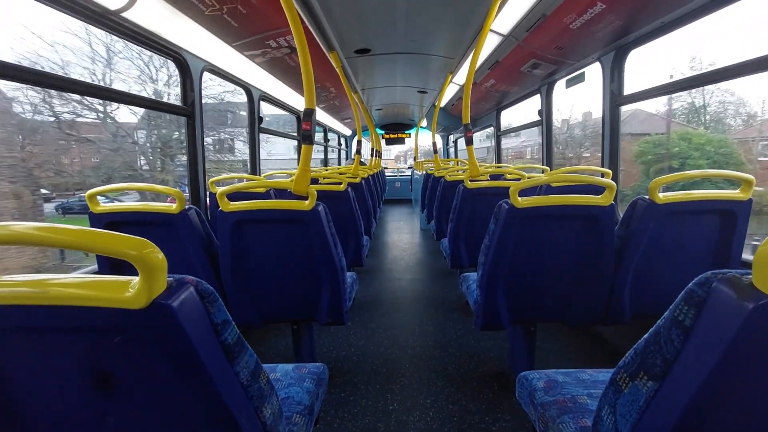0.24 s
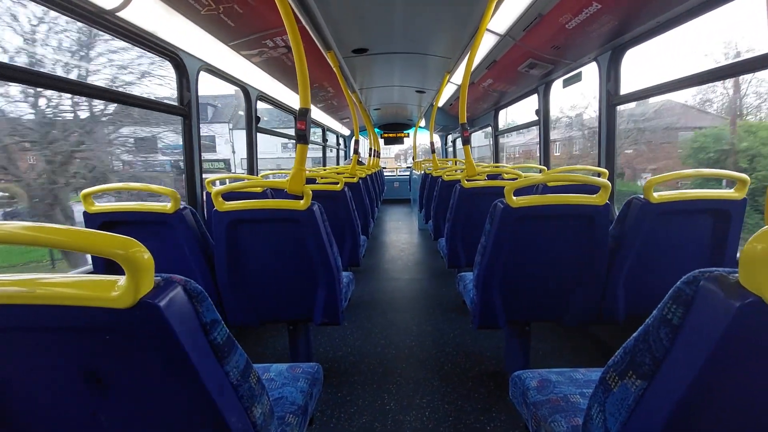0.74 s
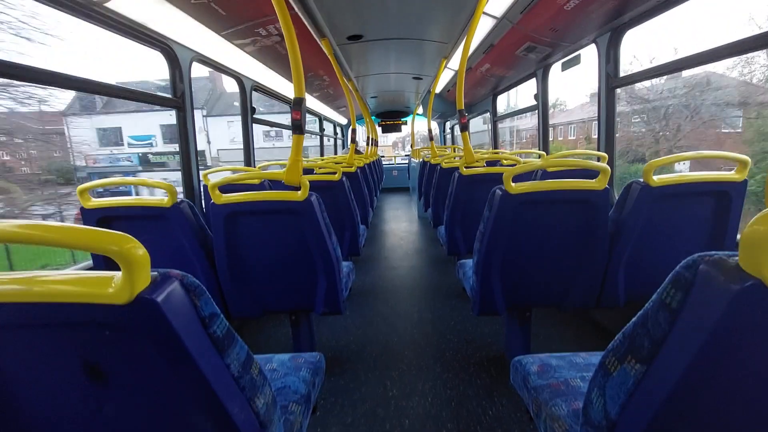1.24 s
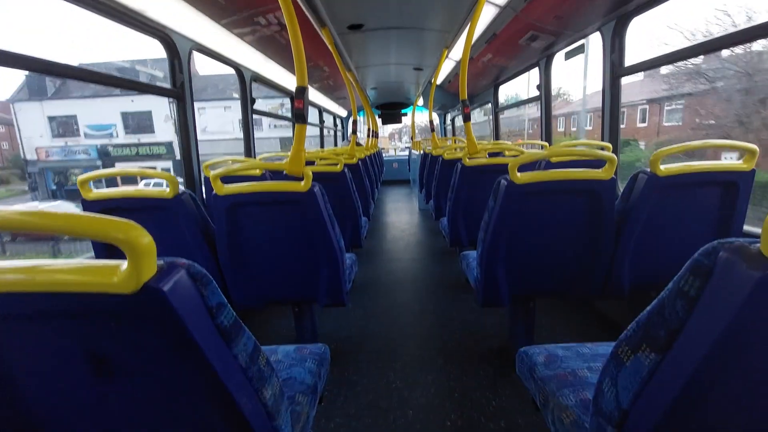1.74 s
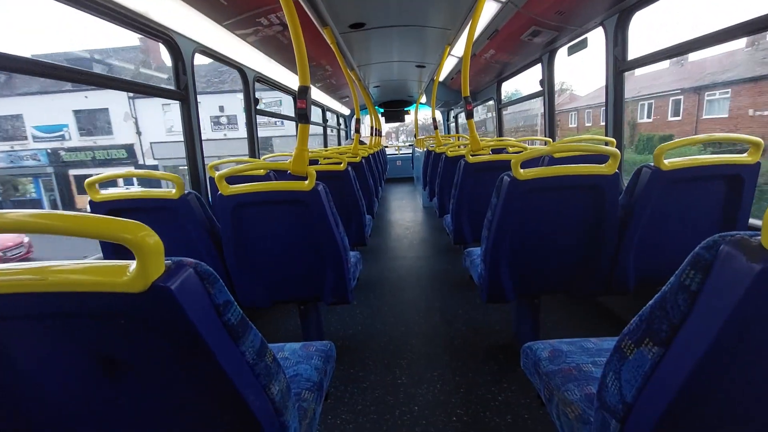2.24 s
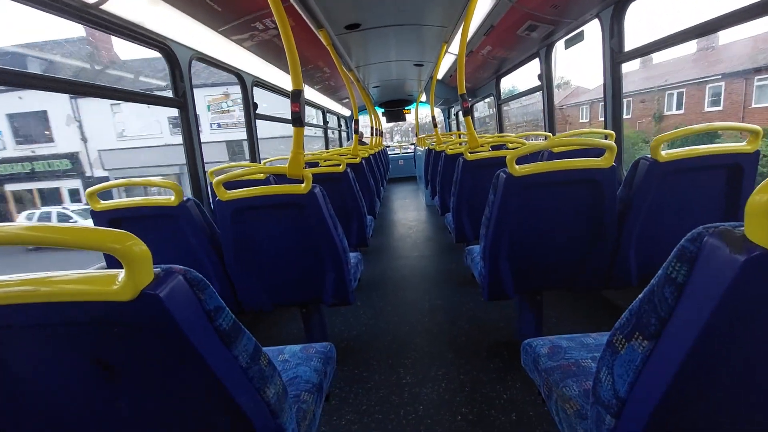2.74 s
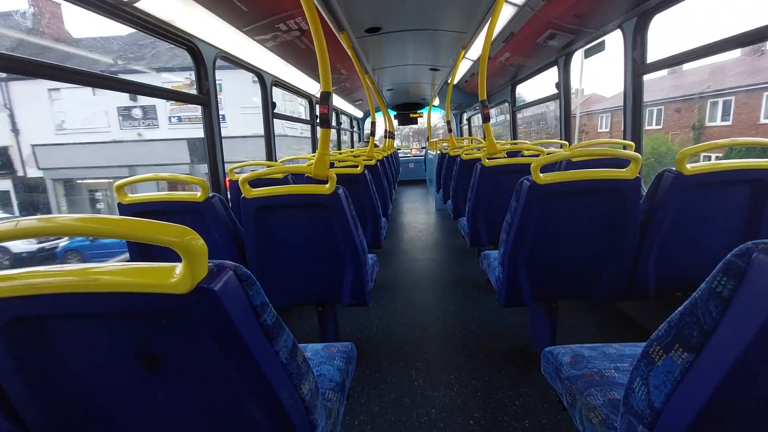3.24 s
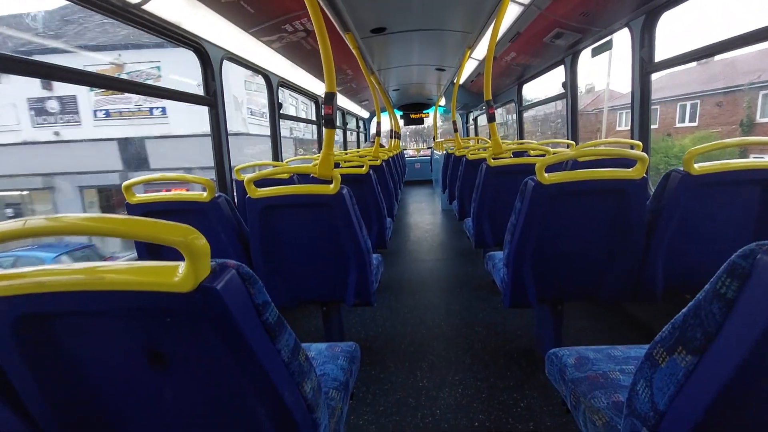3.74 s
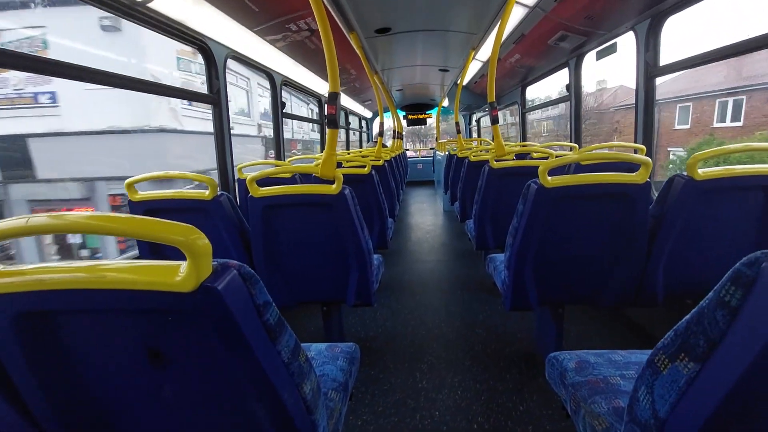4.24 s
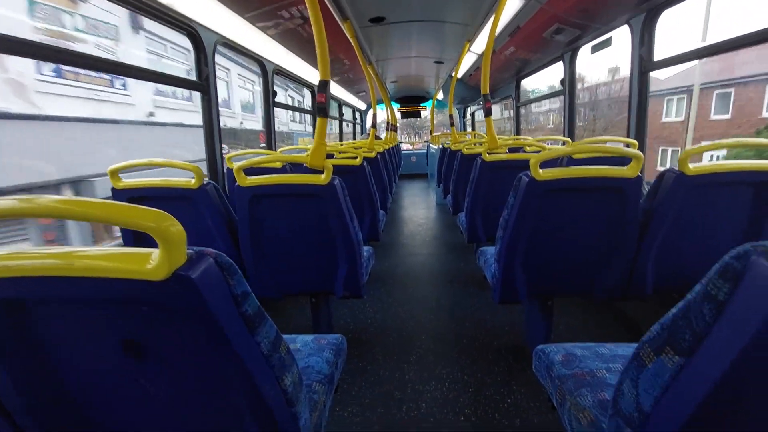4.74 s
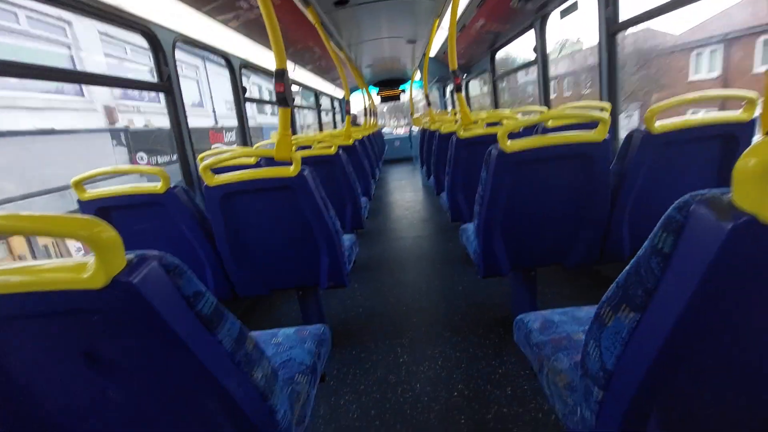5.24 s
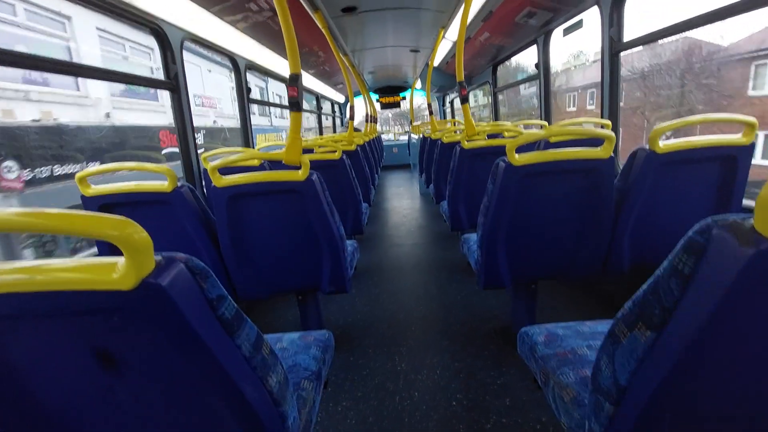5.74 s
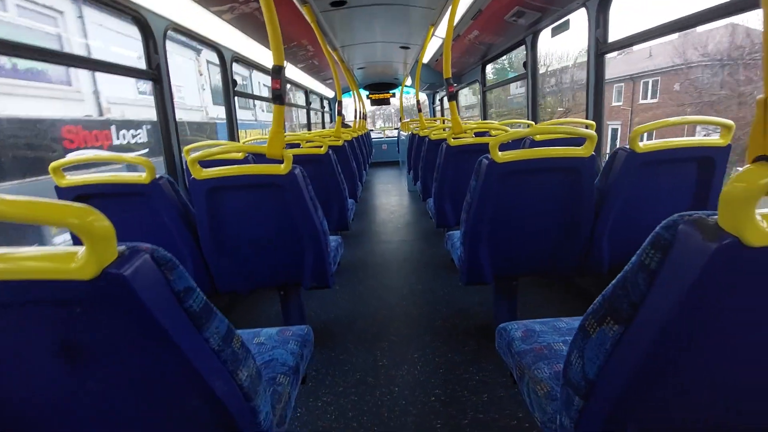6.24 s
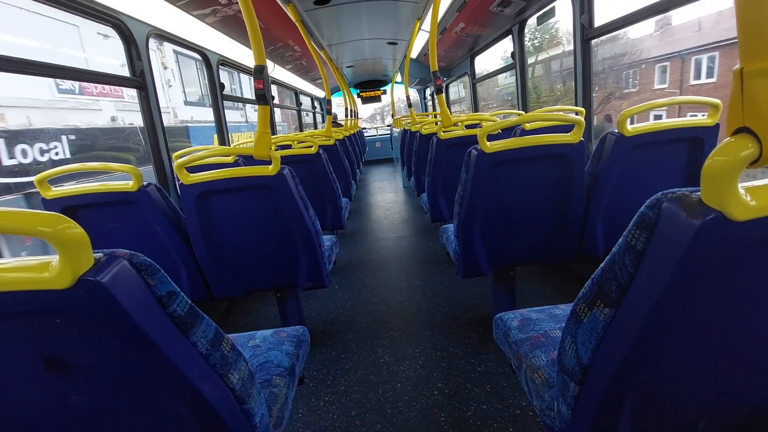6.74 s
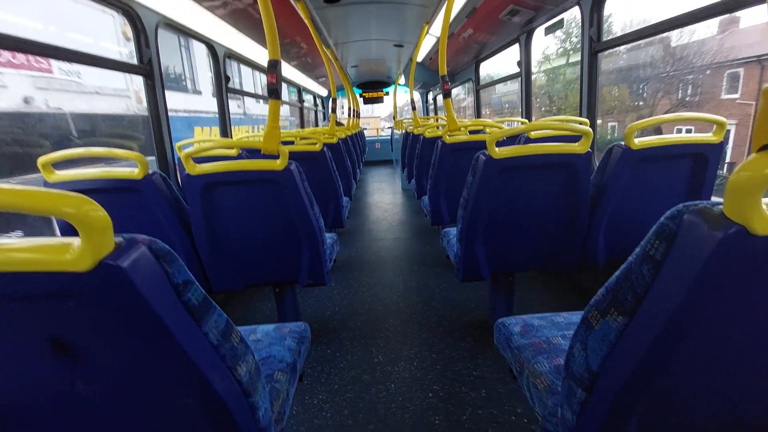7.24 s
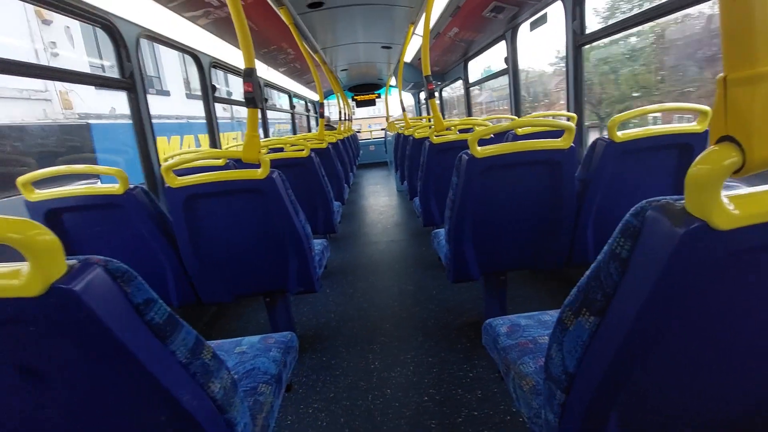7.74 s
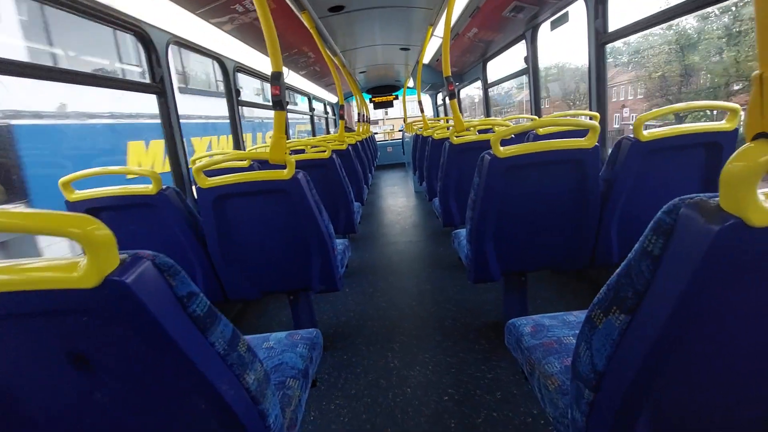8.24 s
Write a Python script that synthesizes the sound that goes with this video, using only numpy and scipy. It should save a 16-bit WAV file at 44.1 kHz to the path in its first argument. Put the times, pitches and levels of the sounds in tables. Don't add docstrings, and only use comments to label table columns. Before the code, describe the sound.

A bus cabin interior, close and boomy, with no people heard. Deep engine drone and body rumble dominate under a wavering, falling axle whine. Small metallic chinks, a tiny plastic chirp and a brief seat squeak appear among dull knocks and glassy rattles. After soft floor thumps, one violent jolt shakes the panels; the level drops afterwards and recovers as the whine stops and the engine rises in pitch.

```python
import sys
import numpy as np
from scipy import signal
from scipy.fft import rfft, irfft
from scipy.io import wavfile
from scipy.ndimage import uniform_filter1d

SR = 44100
rng = np.random.default_rng(int(sys.argv[2]) if len(sys.argv) > 2 else 0)


def attenuation_scalar(level_db):
    decades = np.asarray(level_db, float) / 20
    return 10 ** decades


def dump_mix(stems):
    frames = np.atleast_2d(stems).T
    limited = np.clip(frames, -1, 1)
    pcm = np.round(limited * 32767).astype(np.int16)
    wavfile.write(sys.argv[1], SR, pcm)


N = 373968
T = np.arange(N) / SR
HZ = np.fft.rfftfreq(N, 1 / SR)


def read(table, at=T):
    s, *columns = np.transpose(table)
    return [np.interp(at, s, column) for column in columns]


def on_log(table, hz):
    f, value = np.transpose(table)
    return np.interp(np.log(hz + 1), np.log(f + 1), value)


def unit(x):
    return x / np.sqrt(np.mean(x ** 2))


def ramp(start, length):
    return np.clip((T - start) / length, 0, 1)


def walk(rate):
    hold = int(2000 / rate)
    held = np.repeat(rng.standard_normal(17000 // hold + 1), hold)
    slewed = uniform_filter1d(uniform_filter1d(held, hold), hold)
    return 1.3 * np.interp(T * 2000, range(len(held)), slewed)


def tone(hz, db, wobble_db, drift):
    wobble = wobble_db * (walk(4) + walk(15)) / np.sqrt(2)
    size = np.sqrt(2) * attenuation_scalar(db + wobble)
    cycles = np.cumsum(hz * (1 + drift * walk(6))) / SR
    return size * np.sin(2 * np.pi * cycles + 6 * rng.random())


def decays(s, size, t60):
    env = np.zeros(np.shape(size)[:-1] + (N,))
    for k in range(len(s)):
        i = int(s[k] * SR)
        t = T[:min(int(t60[k] * SR), N - i)]
        fall = np.exp(-np.log(1000) * t / t60[k])
        env[..., i:i + len(t)] += np.multiply.outer(size[..., k], fall)
    return env


# (frequency [Hz], correlation [-1..1])
ALIKE = [(30, .99), (60, .86), (130, .94), (290, .81), (640, .23), (1410, -.36), (3100, .02), (6820, -.08),
         (15000, 0)]


def field(gain):
    mid, side = rfft(rng.standard_normal((2, N)))
    likeness = np.clip(on_log(ALIKE, HZ), -.99, .99)
    opposite = np.array([[1], [-1]])
    return gain * (np.sqrt(1 + likeness) * mid + np.sqrt(1 - likeness) * side * opposite)


# (time [s], firing tone level [dB])
LOAD = [(0, -26), (.4, -35), (1.5, -36), (2, -30), (2.25, -49), (2.7, -36.5), (3.6, -32), (4.2, -27.5),
        (4.75, -34), (5.05, -27), (5.3, -44), (6, -27.5), (6.6, -36), (7, -32), (7.3, -30.5), (8.48, -32)]
# (multiple of the firing rate [ratio], level under the second multiple [dB])
ORDERS = [(.5, -6), (1.5, -8), (2.5, -4), (3, -6), (3.5, -6), (5, -10), (7, -16)]
HIGH_GEAR, LOW_GEAR, SHIFT_S, IDLE_HZ = 11.1, 8.0, 2.275, 43.06
PULL_S, PULL_RISE_S, PULL_HZ = 7.3, .7, 54.26
SECOND_DB, SECOND_FOLLOWS, SECOND_PULL_DB = -38, 0.13, 4.0
MESH_PER_THROB, THROB_S, THROB_DEPTH = 110.5, 0.088, 0.76
DRUM_ORDER, DRUM_DB = 3.55, -35


def engine():
    mesh_hz = read(AXLE)[0]
    ratio = HIGH_GEAR + (LOW_GEAR - HIGH_GEAR) * ramp(SHIFT_S, 0.0508)
    geared_hz = np.maximum(mesh_hz / ratio, IDLE_HZ)
    pull = ramp(PULL_S, PULL_RISE_S)
    hz = geared_hz + (PULL_HZ - geared_hz) * pull

    first_db = read(LOAD)[0]
    second_db = SECOND_DB + SECOND_FOLLOWS * (first_db - np.median(first_db)) + SECOND_PULL_DB * pull

    before_shift = 1 - ramp(SHIFT_S, .05)
    turns = np.cumsum(mesh_hz) / SR / MESH_PER_THROB
    beat = np.cos(2 * np.pi * (turns - np.interp(THROB_S, T, turns)))
    throb = 1 + THROB_DEPTH * before_shift * beat

    drum = before_shift * tone(DRUM_ORDER * hz, DRUM_DB, 2.6, .003)
    firing = throb * tone(hz, first_db + 1.0, 0.84, 0.002)
    double = tone(2 * hz, second_db, 2.9, 0.0041)
    uneven = sum(tone(k * hz, second_db + db - 4.0, 3.5, 0.00395) for k, db in ORDERS)
    return drum + firing + double + uneven


# (time [s], mesh frequency [Hz], whine level [dB])
AXLE = [
    (0, 515, -39),
    (.5, 509.6, -46),
    (1.3, 491.2, -41.5),
    (2.3, 458.4, -51),
    (2.8, 446, -39),
    (3.3, 440, -50.5),
    (4.5, 424.7, -42),
    (5.4, 408.8, -49.5),
    (6.6, 384, -36.5),
    (7.35, 364, -34.5),
]


def axle_whine():
    hz, db = read(AXLE)
    return tone(hz, db - 6.0, 3.4, .006) * np.clip((7.17 - T) / 0.051, 0, 1)


# (frequency [Hz], level over HUM_DB [dB], wobble [dB])
HUM_TONES = [(216.8, -1, 1.45), (426, -27.5, 3.0), (590.7, -17.5, 2.7), (691.4, -21, 2.3)]
HUM_DB = -36


def compressor():
    return sum(tone(f + 0 * T, HUM_DB + db, wobble_db, 0.005046) for f, db, wobble_db in HUM_TONES)


# (time [s], peak level [dB], t60 [s])
THUDS = [(1.92, -19, .4), (3.74, -19.5, 0.27), (4.379, -17, 0.43), (4.756, -12, 0.3), (5.296, -10.5, 0.32),
         (5.314, -10.5, 0.42), (5.347, -10.5, 0.36), (5.385, -2.5, 0.16), (5.424, -22, 0.28),
         (5.45, -13, 0.4), (5.544, -17.5, 0.47), (5.622, -15.5, 0.61), (5.771, -11.5, 0.32),
         (5.94, -16.5, 0.27), (6.047, -14, .3)]
# (frequency [Hz], level per Hz [dB])
THUD_COLOUR = [(24, -35), (40, -2.5), (71, 1.5), (113, -10), (196, -0.5), (234, -1), (273, -1),
               (428, -11.5), (509, -17), (695, -17.5), (2500, -33), (3250, -57), (5500, -120)]


def thuds():
    s, db, t60 = np.transpose(THUDS)
    boom = unit(irfft(field(attenuation_scalar(on_log(THUD_COLOUR, HZ))), N))
    blows = decays(s, attenuation_scalar(db - 10.5), np.clip(t60, .03, 2))
    return boom * uniform_filter1d(blows, size=200)


# (time [s], treble level [dB], mid over treble [dB], left minus right [dB])
KNOCKS = [(0.02, -58, 16, 1), (0.68, -55, 21, -1), (0.941, -53, 16, 1), (0.9794, -51, 11.5, -1),
          (1.046, -57, 14, 3), (1.1807, -53.5, 20, -2), (2.5994, -53, 6, 4), (2.8614, -42.5, 9.5, 1),
          (3.018, -44.5, 12, 4), (3.234, -50.5, 5, 1.5), (3.8325, -50, 8, -7), (4.0802, -50.5, 17.5, -2),
          (4.3794, -54, 11.5, 9), (4.5815, -46, 2, -3.5), (4.783, -50, 0, 2.5), (5.778, -44, 10, -6),
          (5.955, -48.5, 16.5, 0), (6.0364, -47, 11.5, -1), (6.181, -45, 11, 2), (6.2194, -46, 0, 0),
          (6.6594, -51, 5, -4), (7.0882, -48, 14, 2), (7.2492, -54, 19.5, -4), (7.335, -53.5, 17.5, 2),
          (7.4253, -47, 16.5, 3.5), (7.929, -51.5, 16.5, 2)]
# (time [s], treble level [dB], mid over treble [dB], left minus right [dB])
GLASS = [(0.8194, -56, 1, 3), (1.0884, -47, -1, 0.5), (1.346, -49.5, 8.5, 0), (1.5596, -51.5, 9.5, 1.5),
         (2.0474, -55, 7, 4), (2.2154, -46.5, -2, 1.0), (2.62, -57, 4, 1), (2.7028, -48, 10, 1),
         (3.1244, -53, 1, 8), (3.611, -47, -5, 0), (4.119, -57, 4, 3), (4.4274, -43, -6, -.6),
         (4.6293, -43.5, 4.5, -1.5), (4.6924, -48.5, 10, -4), (4.7525, -46, 7, 2), (4.8494, -55, 2, -8),
         (4.92, -53.5, 2, 0), (5.17, -55, 0, 0), (7.3094, -56, 6, 3), (7.36, -57, 2, 1), (8.25, -56, 13, 1)]
# (time [s], treble level [dB], mid over treble [dB], left minus right [dB])
CLATTER = [
    (5.2586, -42, 5, 0),
    (5.296, -42.5, -4, -1.5),
    (5.3414, -25.5, 4, -2),
    (5.377, -44, 20.5, -1),
    (5.4216, -31, -1, 0),
    (5.472, -50, 20.5, 0.5),
    (5.5426, -34, 0.5, 0),
    (5.59, -49.5, -3, 7),
    (5.6653, -45, 0, 1),
]
# (top band over treble [dB], t60 [s])
RATTLE_KINDS = [
    (-10.5, 0.21),
    (-3.5, 0.48),
    (-5, 0.29),
]
# (frequency [Hz], level per Hz [dB])
RATTLE_COLOUR = [(1180, -31), (2000, -2), (2090, -5.5), (2590, -1.5), (3510, -6.5), (3830, -2),
                 (4250, -5.5), (7450, -8), (9330, -17.5), (12300, -11.5), (15800, -14)]


def rattles():
    kinds = [KNOCKS, GLASS, CLATTER]
    s, treble_db, dull_db, pan_db = np.transpose(sum(kinds, []))
    top_db, t60 = np.repeat(RATTLE_KINDS, [len(kind) for kind in kinds], axis=0).T
    t60 = np.clip(t60, .02, 2)
    sides = attenuation_scalar(np.array([pan_db, -pan_db]) / 2)
    colour = attenuation_scalar(on_log(RATTLE_COLOUR, HZ))
    grain = attenuation_scalar(1.1 * walk(200))

    treble = colour * (HZ > 2800) * (HZ < 9300)
    top = colour * (HZ >= 9300)
    dull = np.exp(-(np.log2(HZ / 1250 + 1e-9) / 0.99) ** 2)
    # (spectrum, level [dB], shake [dB], tick [dB], stretch of t60)
    parts = [(treble, treble_db, -10, -9.5, 1.05),
             (top, treble_db + top_db, -4.5, -3, .9),
             (dull, treble_db + dull_db, -8, -11, .85)]
    out = 0
    for spectrum, db, shake_db, tick_db, longer in parts:
        shake = decays(s, attenuation_scalar(db + shake_db) * sides, longer * t60) * grain
        tick = decays(s, attenuation_scalar(db + tick_db) * sides, 0 * s + 0.011)
        out = out + unit(irfft(field(spectrum), N)) * (shake + tick)
    return out


# (time [s], low ring level [dB], high ring level [dB])
CHINKS = [(1.0904, -58, -64), (1.921, -57, -63), (1.9944, -63, -61), (2.0494, -64, -50), (2.3715, -61, -61),
          (2.4324, -68, -64), (2.4892, -63, -65), (3.1244, -67, -63), (3.1794, -61, -60),
          (3.2354, -64, -60), (3.3862, -65, -72), (3.6112, -63, -68), (4.0003, -72, -78),
          (4.1194, -66, -68), (5.6072, -52, -62), (5.7987, -59, -58), (6.4872, -60, -70),
          (6.7496, -57, -71), (6.8518, -66, -79), (6.9042, -56, -72)]
# (frequency [Hz], t60 [s], level [dB])
RINGS = [(4990, 0.24, -5.5), (13800, 0.09, -5.5)]


def chinks():
    s, *levels = np.transpose(CHINKS)
    ring = 0
    for db, (hz, t60, ring_db) in zip(levels, RINGS):
        taps = decays(s, attenuation_scalar(db + ring_db), 0 * s + t60)
        ring = ring + taps * tone(hz * (1 + .004 * walk(150)), 3.0 * walk(90), 2.7, 0.001)
    return ring * attenuation_scalar(np.array([[2.5], [-3.5]]))


def rubbing_note(table, octave_db):
    hz, db = read(table)
    rub_db = db + 3.5 * walk(120)
    hz = hz * (1 + 0.0128 * walk(90))
    upper_db = rub_db + octave_db + .8 * (db - db.max())
    note = tone(hz, rub_db, 1.536, .004) + tone(2 * hz, upper_db, 1.8, .004)
    return note * (T > table[0][0]) * (T < table[-1][0])


# (time [s], frequency [Hz], level [dB])
SQUEAK = [
    (2.915, 1850, -73),
    (2.945, 1870, -47),
    (2.965, 1865, -48),
    (2.99, 1810, -53),
    (3.02, 1770, -54),
    (3.07, 1790, -60),
]


def seat_squeak():
    return rubbing_note(SQUEAK, -13)


# (time [s], frequency [Hz], level [dB])
CHIRP = [
    (1.043, 5370, -80),
    (1.047, 5340, -57),
    (1.058, 5340, -63),
    (1.066, 5340, -80),
]


def plastic_chirp():
    return rubbing_note(CHIRP, -30)


# (frequency [Hz], level per Hz [dB])
AIR_COLOUR = [(1470, -35), (2500, -9), (2830, 2), (3350, -5), (4600, -8.5), (6310, -10), (9800, -27),
              (13200, -12.5), (15800, -25)]
AIR_S, AIR_DB, AIR_ATTACK_S, AIR_FADE_DB_S, AIR_FADE_DB_S2 = 1.745, -49, .01, 12.5, 15


def air():
    since = np.maximum(T - AIR_S, 0)
    db = AIR_DB - AIR_FADE_DB_S * since - AIR_FADE_DB_S2 * since ** 2
    hiss = unit(irfft(field(attenuation_scalar(on_log(AIR_COLOUR, HZ))), N))
    return hiss * attenuation_scalar(db) * ramp(AIR_S, AIR_ATTACK_S)


# (frequency [Hz], level per Hz [dB])
LOW = [(12, -58), (20, -37), (34, -7.5), (56, 1), (80, -5.5), (157, -6.5), (188, -8), (215, -5), (245, -13),
       (313, -12.5), (400, -19), (434, -18), (471, -21), (592, -20.5), (1000, -31), (1300, -67),
       (2200, -120)]
# (frequency [Hz], level per Hz over JOIN_DB [dB])
HIGH = [(1000, -1.5), (1290, -1), (1780, -0.5), (2090, -5.5), (2600, -8.5), (3290, -15.5), (5000, -18.5),
        (7700, -24.5), (8500, -31.5), (10300, -32), (11300, -27), (13600, -27), (15000, -27), (16000, -40)]
BODY_DB, JOIN_DB = -27.5, -31.5
# (frequency [Hz], width [Hz], level [dB])
PANELS = [(54, 22, -5), (158, 10, 6), (240, 10, 3.5), (314, 22, 4.5), (1094, 14, 4), (1203, 10, 3)]
# (time [s], level [dB])
SHAKE = [(0, -1), (.68, -2), (1.05, 1), (1.63, -2.5), (1.92, 7), (2.4, 0.5), (3.1, 1.5), (3.7, -3.5),
         (4.3, -0.5), (4.6, 4.5), (5.17, -5.5), (5.43, 13), (5.6, 8), (5.86, -1.5), (6.45, -3), (7.0, -3),
         (7.4, 1), (8.0, -1)]
BODY_HZ = [180, 600, 1600, 5000, 11000]
FOLLOWS = [0.31, -0.15, 0.22, 0.71, 1.05]
SPEED_DB = [0.32, 1.7, 0.027, -0.11, -1.2]


def body():
    db = np.where(HZ < 1000, on_log(LOW, HZ), on_log(HIGH, HZ) + JOIN_DB)
    db = db + sum(d / (1 + (2 * (HZ - f) / width) ** 2) for f, width, d in PANELS)
    noise = field(attenuation_scalar(db))
    noise = noise / np.sqrt(np.mean(irfft(noise, N) ** 2))

    shake_db, mesh_hz = read(SHAKE)[0], read(AXLE)[0]
    speed = (mesh_hz - mesh_hz.mean()) / 100
    swells = []
    for follow, speed_db, swell_db in zip(FOLLOWS, SPEED_DB, [0.17, 0.41, 0.12, 0.86, .8]):
        swells.append(follow * shake_db + speed_db * speed + swell_db * walk(13))

    out = 0
    for step in range(-11, 9):
        distance = np.log2(HZ / 1000 + 1e-9) * 2 - step
        window = np.cos(np.pi / 2 * np.clip(distance, -1, 1)) ** 2
        band = irfft(noise * window, N)
        place = np.interp(step / 2, np.log2(np.array(BODY_HZ) / 1000), range(5))
        k = min(int(place), 3)
        share = place - k
        swell = (1 - share) * swells[k] + share * swells[k + 1]
        out = out + band * attenuation_scalar(swell + 0.56 * walk(14))
    return out * attenuation_scalar(BODY_DB)


def scene():
    drive = engine() + axle_whine() + compressor()
    rubbing = seat_squeak() + plastic_chirp()
    jolts = thuds() + rattles() + chinks()
    return drive + rubbing + jolts + air() + body()


# (frequency [Hz], left minus right [dB])
LEAN = [(60, -2.2), (110, -2), (200, -2.8), (380, -2), (700, -2.3), (1290, -1.7), (2380, 1.5), (4400, 1.2),
        (8120, -.5), (15000, -1.5)]
TOP_HZ, PAD = 15830, 2048
DUCK_DB, DUCK_S, DUCK_FALL_S, RECOVER_S, RECOVER_RISE_S = -6, 5.467, 0.57, 6.675, .5


def top_cut(x):
    return signal.sosfilt(signal.butter(12, 15970, fs=SR, output="sos"), x)


def record(dry):
    duck = attenuation_scalar(DUCK_DB * (ramp(DUCK_S, DUCK_FALL_S) - ramp(RECOVER_S, RECOVER_RISE_S)))
    rounded = np.tanh(1.635 * dry * duck) / 1.57
    padded = np.pad(rounded, ((0, 0), (PAD, PAD)), "reflect")
    length = padded.shape[1]
    hz = np.fft.rfftfreq(length, 1 / SR)
    lean = attenuation_scalar(np.array([[.5], [-.5]]) * on_log(LEAN, hz))
    low_cut = 1 / np.sqrt(1 + (24 / (hz + 1)) ** 4)
    response = lean * low_cut * (hz < TOP_HZ)
    finished = irfft(rfft(padded) * response, length)[:, PAD:-PAD]
    return top_cut(finished)


dry = scene()
out = record(dry)
dump_mix(out)
```